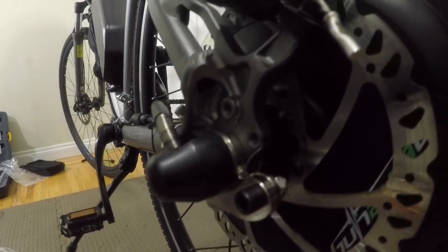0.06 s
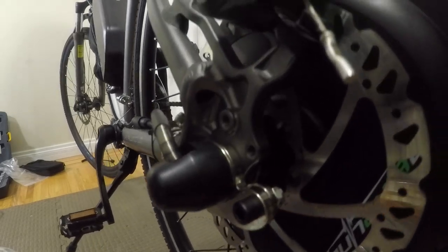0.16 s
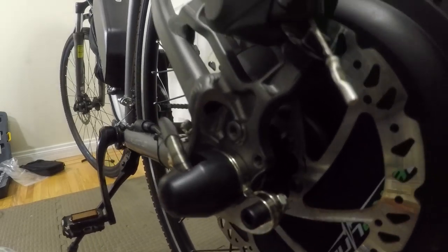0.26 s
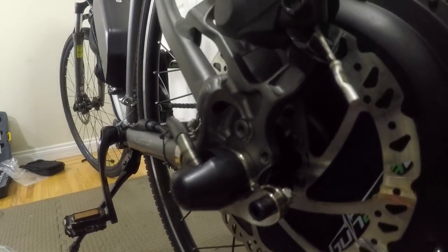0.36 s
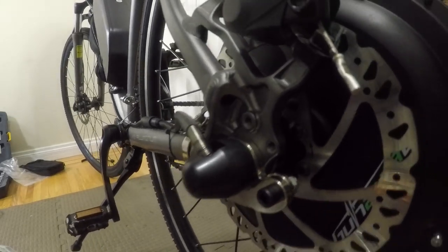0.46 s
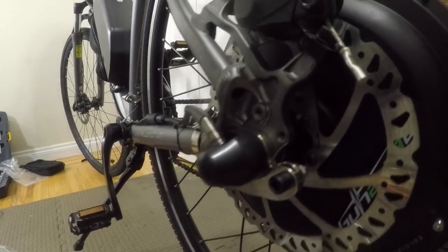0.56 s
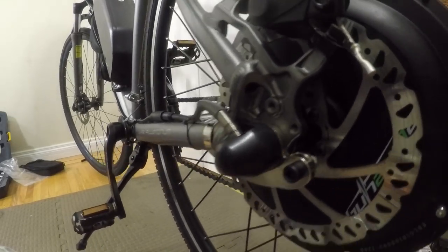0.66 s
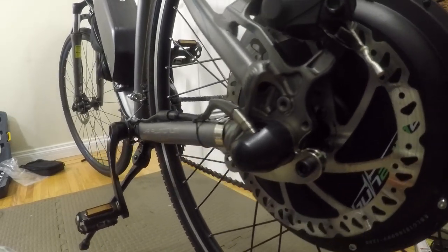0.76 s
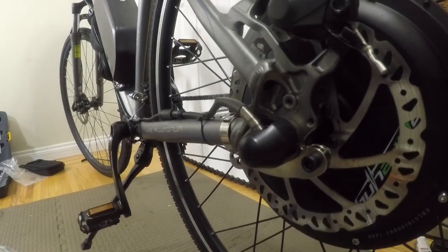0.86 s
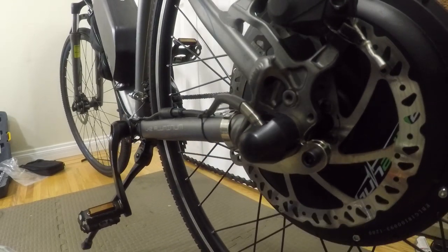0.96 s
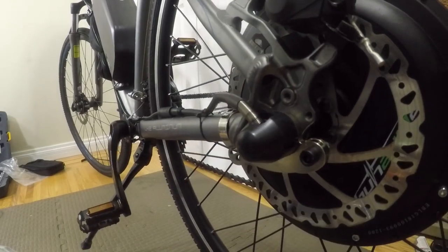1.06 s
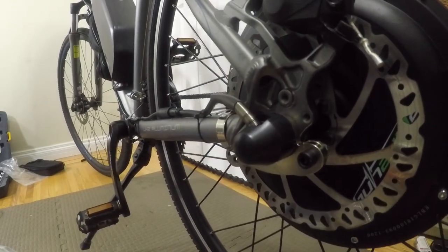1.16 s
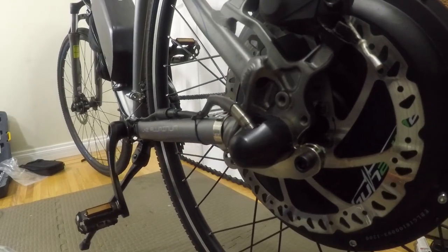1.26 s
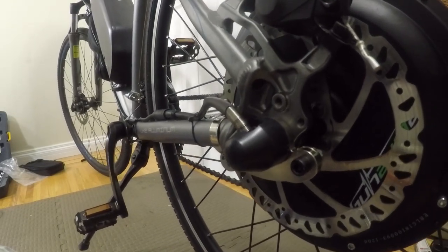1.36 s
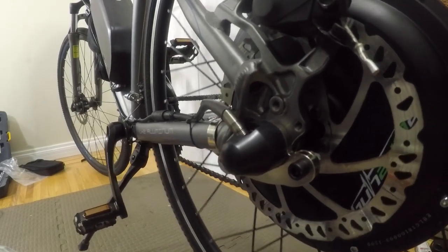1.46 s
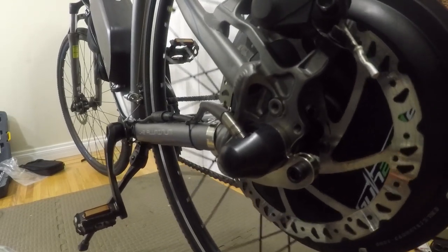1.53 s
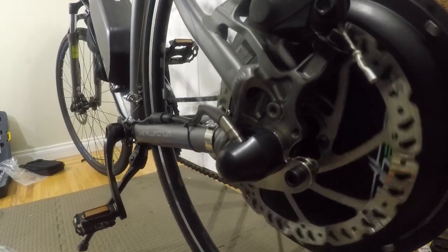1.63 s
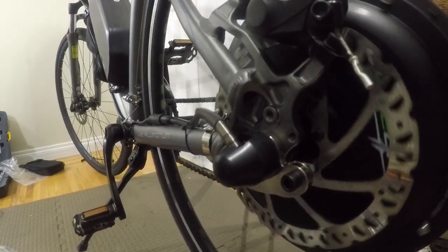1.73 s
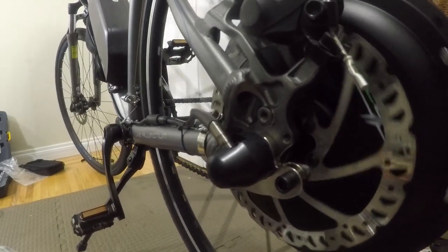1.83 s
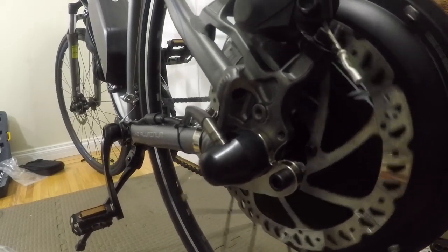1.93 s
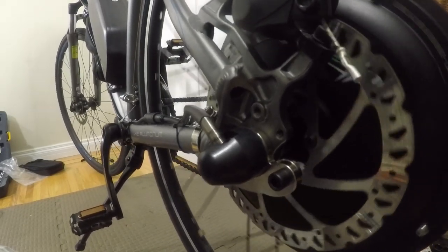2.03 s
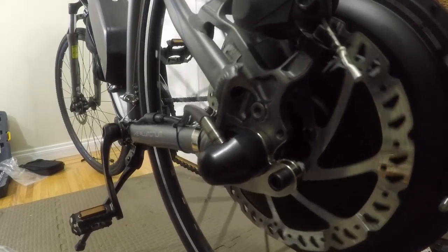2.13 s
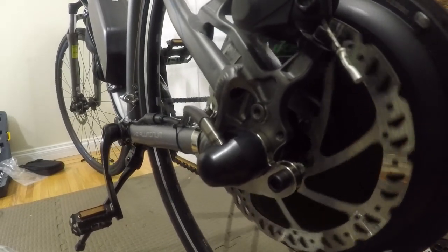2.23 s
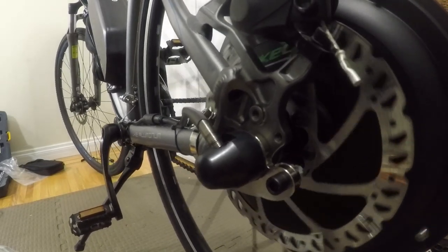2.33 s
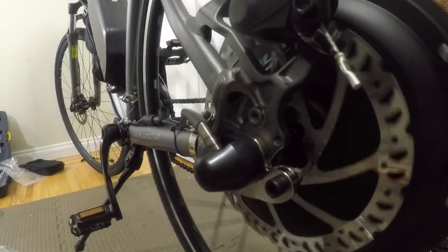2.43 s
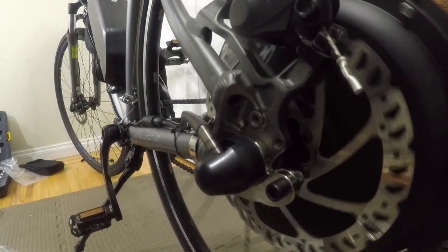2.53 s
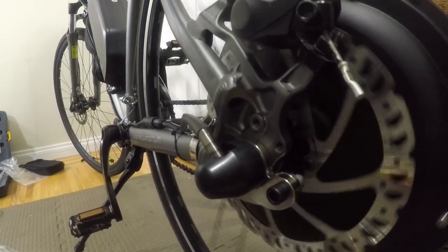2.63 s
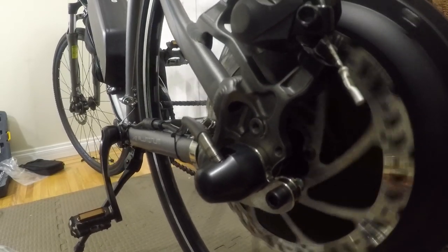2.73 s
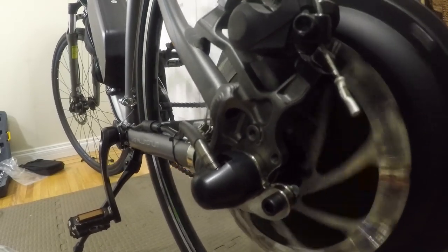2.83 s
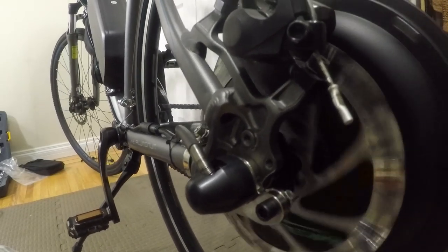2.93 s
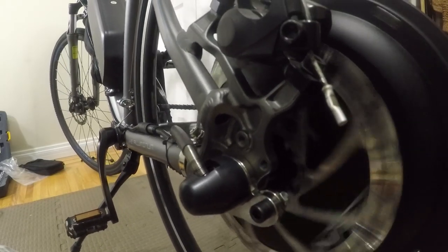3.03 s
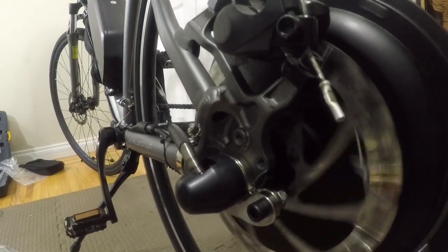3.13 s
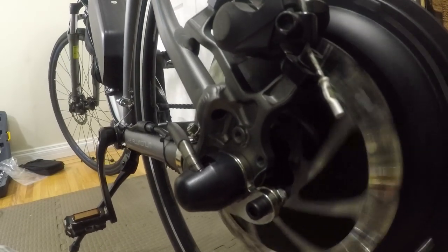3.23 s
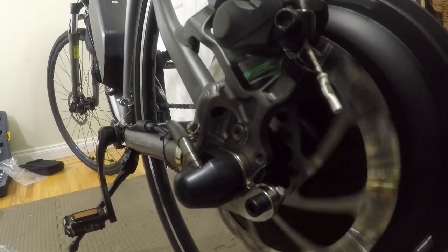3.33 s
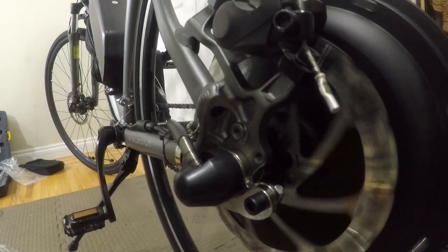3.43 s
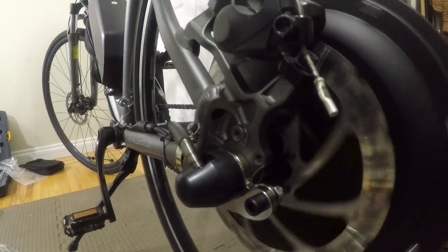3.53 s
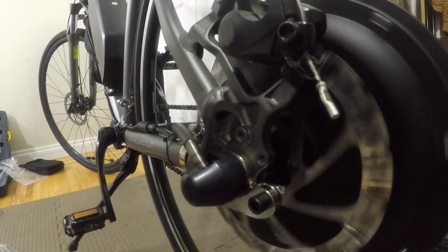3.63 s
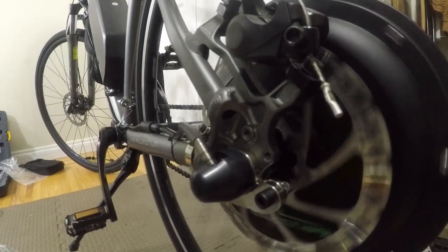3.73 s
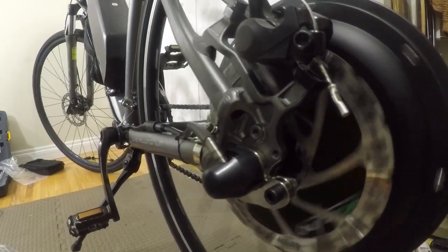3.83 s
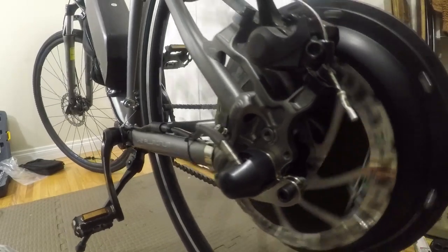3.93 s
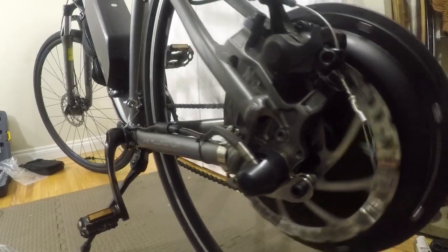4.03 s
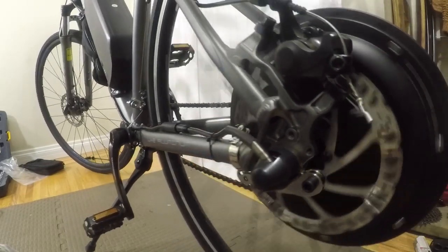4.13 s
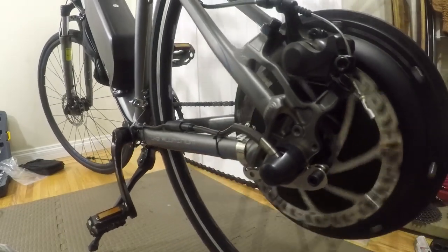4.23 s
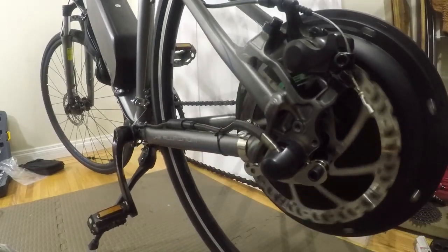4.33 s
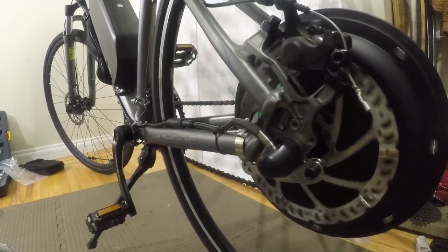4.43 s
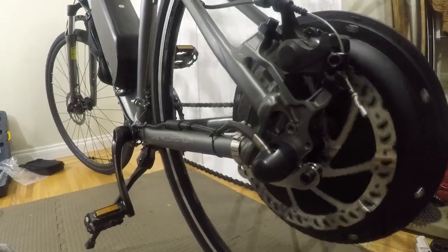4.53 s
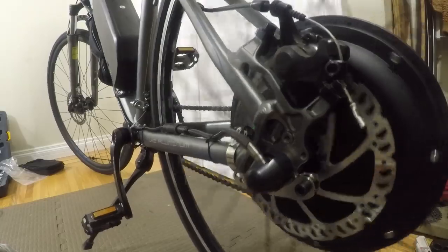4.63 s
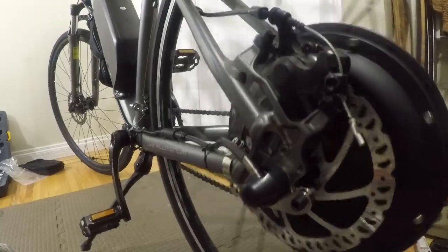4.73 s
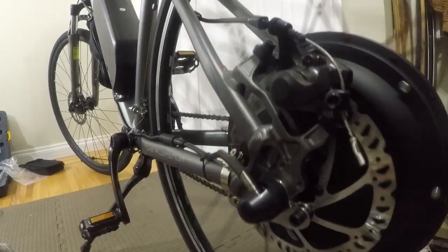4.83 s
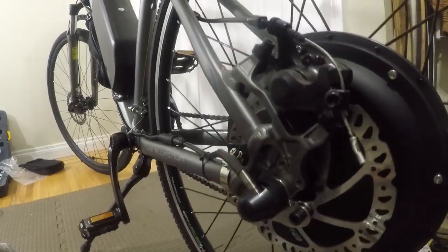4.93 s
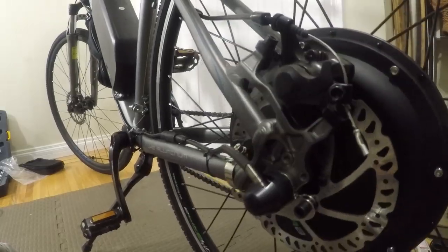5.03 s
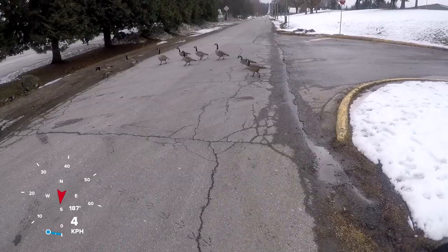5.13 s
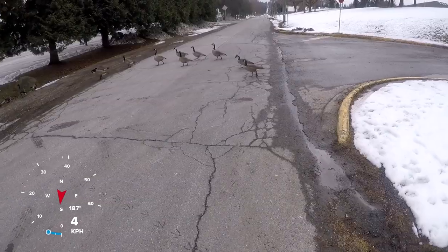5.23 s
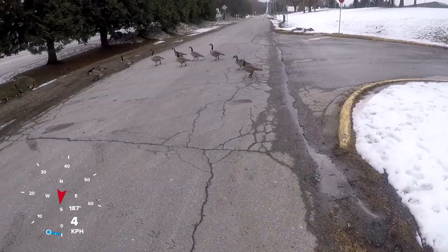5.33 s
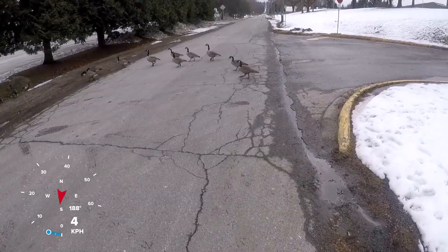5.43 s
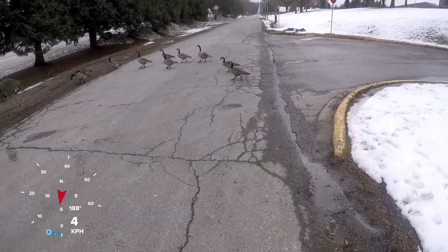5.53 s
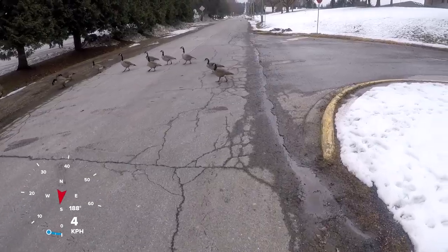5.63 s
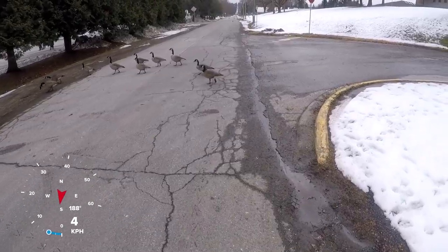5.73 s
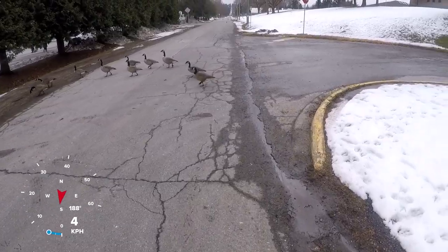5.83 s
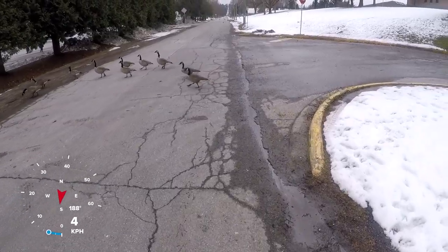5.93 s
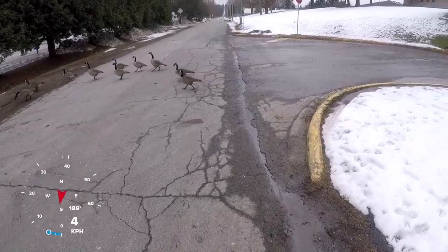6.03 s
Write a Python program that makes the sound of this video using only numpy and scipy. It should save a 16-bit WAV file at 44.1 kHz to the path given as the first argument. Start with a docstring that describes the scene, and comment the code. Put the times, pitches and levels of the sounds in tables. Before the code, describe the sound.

A bicycle hub motor spins a wheel indoors, sharp metallic clicks racing then slowing over brake-disc hiss, before cutting to near-silent, then dull outdoor street noise.

```python
"""A bicycle wheel is spun up indoors by its hub motor and coasts: a loose part snaps over the spokes, each snap
a burst of noise shaped into a crack and rung through resonators. Random small impacts make the gears chatter
and the brake disc hiss and ring; noise through resonators hums, a sine whines, shaped noise is the room's hush.
A falling, wavering tone with rough bass rumbles, then a hard cut leaves a nearly silent street of faint noise.
A duller, louder street noise switches in, with a drone, a brief midrange hiss and one knock."""
import sys
import numpy as np
from scipy import signal
from scipy.fft import rfft, irfft
from scipy.io import wavfile
from scipy.ndimage import uniform_filter1d

SR = 44100
rng = np.random.default_rng(int(sys.argv[2]) if len(sys.argv) > 2 else 0)


def to_wav(sig):
    """Store sig (one row per channel, or 1-D mono) as 16-bit WAV at the path in sys.argv[1].

    Samples outside -1..1 are clipped; the rate is SR.
    """
    pcm = np.clip(np.atleast_2d(sig), -1, 1) * 32767
    pcm = np.round(pcm).astype(np.int16)
    wavfile.write(sys.argv[1], SR, pcm.T)  # frames by channels


N = 267775
T = np.arange(N) / SR  # seconds
CUT_S, SWITCH_S = 5.167, 5.621  # room to quiet street, then the louder street noise

# Levels of the indoor layers are those before the room, the port shading and the filters.
# Spectra give relative density; modes give nominal pitch, relative level and decay time.
# Hush of the room, spectrum: pitch_hz, density_db (per Hz)
HUSH_SPECTRUM = [(20, -27.5), (65, -31), (88, -30.5), (107, -45.5), (134, -8.5), (163, 0), (328, -10.5),
                 (1260, -23), (1610, -23.5), (3340, -36.5), (9670, -33.5), (14700, -41.5), (16000, -66)]
# Hush of the room over time: time_s, level_db
HUSH_LEVEL = [(0, -48), (.9, -50.5), (1.3, -52), (1.6, -48), (2.8, -46), (4.2, -47), (5.17, -49)]
# Short clicks before the motor starts: start_s, peak_db
CLICKS = [(0.031, -48.5), (0.243, -52), (0.345, -48), (0.361, -40)]
# Single ticks in hub and frame: start_s, peak_db, upper_modes_db (against the lower modes)
TICKS = [(1.388, -37, -14), (1.5005, -50, 2), (1.5386, -43.5, 6), (1.605, -30, 4), (1.6817, -43, -5),
         (2.038, -39.5, -2), (2.146, -40, 6), (2.184, -41, 9), (2.258, -39, 6), (2.7254, -31.5, 5),
         (2.747, -27, 9.5), (2.766, -27.5, 10), (2.781, -25, 6.5), (2.7993, -28.5, 5.5), (2.815, -29, 0.5)]
# Modes of the hub shell: pitch_hz, level_db, t60_s
HUB_MODES = [(4450, -4, .045), (4650, -10, .03), (5250, -3, .008), (5650, -6, .02), (7220, 0, .015),
             (9270, -7, .008)]
HUB_UPPER_HZ = 6500
# Controller whine over time: time_s, level_db (before its flicker)
WHINE_LEVEL = [(1.40, -85), (1.43, -63), (2.6, -52), (3.1, -80)]
WHINE_HZ = 15030

# The motor pushes: start_s, hold_s, gear_chatter_db, hum_db
PUSHES = [(1.516, 0.044, -57, -55.5), (2.693, 0.07, -42.5, -46.5)]
PUSH_ATTACK_S, GEAR_RELEASE_DB_S, HUM_RELEASE_DB_S = 0.088, 107, 24.5
GEAR_IDLE_DB, GEAR_DB_PER_OCTAVE = -70, 3.7
HUM_IDLE_DB, HUM_DB_PER_OCTAVE = -67, 1.2
# Hum of the windings: pitch_hz, level_db, t60_s
HUM_MODES = [(506, 1, .14), (528, -1, .11), (563, -2, .1), (740, -11, .07)]
# Low tones of the windings, only under load: pitch_hz, level_db, t60_s
GROWL_MODES = [(215, 2, .12), (410, -4, .18)]
GROWL_DB, GROWL_RELEASE_DB_S = 2, 100  # against the hum of the same push

# The pad bites the high spot of the disc: start_s, hold_s, rub_level_db
BITES = [(1.623, 0.021, -58), (1.652, 0.04, -58), (2.953, 0.061, -49), (3.019, 0.025, -50),
         (3.76, 0.15, -49.5)]
BITE_ATTACK_S, BITE_RELEASE_DB_S = 0.025, 192.5
DRAG_DB, DRAG_DB_PER_OCTAVE = -61, 6  # steady rub
# Hiss of the pad, spectrum: pitch_hz, density_db (per Hz)
PAD_SPECTRUM = [(500, -51), (1000, 13.5), (2300, 10.5), (4500, 8.5), (7500, 12), (10000, -26.5),
                (15000, -24.5)]
# Modes of the brake disc: pitch_hz, level_db, t60_s
DISC_MODES = [(1000, -10, .04), (1500, -10, .08), (2290, -1, .07), (2430, -10, .06), (3240, -15, .06),
              (3500, -8, .08), (4450, -1, .04), (4620, 1, .045), (5670, -5, .04), (6400, -7, .05),
              (7425, -9, .05)]
DISC_FLUTTER_DB = 4.5  # each mode comes and goes alone
# Thin tones of the disc sing for a moment: start_s, hold_s, level_db, pitch_hz
SINGS = [(1.73, 0.053, -65, 2460), (2.24, 0.25, -62, 2470), (3.0, 0.14, -56.5, 2480),
         (3.03, .02, -41, 7430), (3.25, 0.09, -48, 2446)]
SING_RELEASE_DB_S = 151.5
# A last rasp as the wheel stops: start_s, hold_s, level_db
RASP = (4.855, 0.026, -47)
# Rasp, spectrum: pitch_hz, density_db (per Hz)
RASP_SPECTRUM = [(1500, -6.5), (3000, -7), (4500, 2), (6000, -8.5), (9000, -9.5), (13000, -33)]
RASP_RELEASE_DB_S = 270

# The loose part snaps over a spoke: start_s, bright_peak_db, low_peak_db, strongest_low_hz
SNAPS = [(1.6336, -36.5, -41, 1940), (1.7345, -37, -34, 2130), (1.8364, -49, -45, 1390),
         (1.951, -34.5, -35.5, 1460), (2.0851, -35, -34.5, 2980), (2.2209, -41.5, -49, 2950),
         (2.3299, -40.5, -47, 2120), (2.4346, -33.5, -34, 2960), (2.5366, -27, -33, 2130),
         (2.6255, -28.5, -31, 2160), (2.7072, -38, -31, 2240), (2.7744, -39, -35, 2200),
         (2.825, -30.5, -37, 3180), (2.8604, -37.5, -43, 2260), (2.8986, -35.5, -49.5, 2260),
         (2.9347, -36, -35, 2120), (2.9684, -31.5, -41, 2320), (3.0042, -33.5, -39, 1470),
         (3.0402, -31, -43, 2290), (3.0757, -33, -41, 2270), (3.1128, -35, -32, 3230),
         (3.1505, -32.5, -34, 2250), (3.1872, -32.5, -28.5, 2150), (3.2255, -31, -35, 1060),
         (3.2626, -34.5, -36, 1120), (3.3029, -37.5, -34.5, 2490), (3.342, -31, -38, 2400),
         (3.3817, -29, -30.5, 2000), (3.4237, -30, -34, 2070), (3.4631, -29.5, -28, 2110),
         (3.5054, -40, -30, 2150), (3.5468, -34.5, -29, 2160), (3.591, -37.5, -31.5, 2130),
         (3.6353, -38, -53, 2100), (3.683, -39, -49, 2140), (3.7282, -35, -40, 2110),
         (3.7764, -31.5, -45, 1500), (3.8223, -34.5, -43, 2300), (3.8727, -32.5, -37, 3570),
         (3.9235, -36, -40, 1980), (3.9776, -34, -40.5, 1980), (4.0313, -39, -37, 2260),
         (4.0879, -40, -35.5, 2900), (4.1408, -29, -37, 1850), (4.2011, -30, -36, 3080),
         (4.262, -32.5, -51, 2040), (4.3253, -29.5, -36.5, 2950), (4.392, -31, -38, 3070),
         (4.4604, -27, -31, 2030), (4.5299, -31, -32, 2210), (4.6014, -33, -30.5, 2230),
         (4.679, -32, -37, 2170), (4.7614, -29, -41, 2250), (4.8494, -29.5, -45, 3390)]
# On a slow wheel it bounces once more: start_s, peak_db (of its bright ring)
BOUNCES = [(1.644, -42), (4.611, -30.5), (4.689, -32.5), (4.772, -35), (4.861, -29)]
# Crack of a snap, spectrum: pitch_hz, density_db (per Hz)
CRACK_SPECTRUM = [(410, -53.5), (700, -34.5), (1110, -10), (1780, -22.5), (2140, -7.5), (2680, -19.5),
                  (3020, -9.5), (3880, -15), (4540, -12), (6660, -15.5), (7800, -4.5), (10400, -26),
                  (12400, -11), (14900, -6), (16300, -41.5)]
# Shrill ring of a snap: pitch_hz, level_db, t60_s
SHRILL_MODES = [(12490, -4.5, 0.021), (13150, 1, 0.007), (14160, -8.5, 0.013)]
# Bright ring of a snap: pitch_hz, level_db, t60_s
BRIGHT_MODES = [(7500, -7, .01), (7780, -3, .014), (7970, 0, .02), (7950, -12, .075), (7860, -14, .065),
                (7650, -21, .06)]
# Lower tones common to the spokes: pitch_hz, level_db, t60_s
SPOKE_MODES = [(2110, -16, 0.059), (3470, -6.5, 0.02)]
SLOW_PER_S = 10  # speed-following levels are given at this many snaps a second
CRACK_DB, CRACK_DB_PER_OCTAVE = -28, 0.5  # peak; a faster wheel cracks harder
CRACK_SCATTER_DB, SHRILL_SCATTER_DB = 1.5, 2.5

# Tone that sinks into a rumble: time_s, pitch_hz (before its waver), level_db
RUMBLE_PATH = [(4.86, 299, -55), (4.915, 248.5, -43), (4.95, 110, -41), (5.0, 55.7, -40),
               (5.06, 35.8, -36.5), (5.17, 27, -37.5)]
# Rough bass around it, spectrum: pitch_hz, density_db (per Hz)
RUMBLE_SPECTRUM = [(14, -25), (30, 0), (45, -4), (59, 2), (80, -6), (200, -16), (500, -38)]

ROOM_T60_S, ROOM_DB = 0.24, -5.5  # tail decay; tail energy before its low-pass, against the direct sound
TAIL_TOP_HZ, WIND_CUT_HZ = 15300, 125
FAR_PORT_DB = -3.5  # the left port is shaded from the wheel
STEREO_HZ, TOP_HZ = 11500, 16400  # indoors the channels differ only above the first; top of the whole mix

# Faint wind and distance, spectrum: pitch_hz, density_db (per Hz)
FAR_SPECTRUM = [(12, -33), (20, -1), (37, -8.5), (80, -17.5), (175, -26), (235, -29.5), (2540, -54),
                (12000, -57.5), (15600, -90.5), (22000, -120)]
FAR_DB = -68
# Street noise, spectrum: pitch_hz, density_db (per Hz)
STREET_SPECTRUM = [(12, -38), (20, -9), (60, -22), (108, 0), (151, -6.5), (285, -6), (347, -13.5),
                   (500, -10), (638, -14), (757, -13), (966, -19.5), (6800, -34), (8840, -86),
                   (15000, -120)]
STREET_DB, STREET_TOP_HZ = -51.5, 6900
DRONE_HZ, DRONE_DB = 285, -55
CRUNCH_HZ, CRUNCH_DB, CRUNCH_RELEASE_DB_S = 1780, -62, 84
# Modes of the knock: pitch_hz, level_db, t60_s
KNOCK_MODES = [(287, 0, 0.03), (510, 3, 0.03), (730, -2, 0.02), (1150, -8, .015), (1600, -8, 0.012)]
KNOCK_S, KNOCK_DB = 5.752, -35.5  # start; peak before the street's low-pass


def undb(db):
    """Decibels to gain."""
    return 10 ** (np.asarray(db) / 20)


def unit(x):
    """Scale to rms 1."""
    return x / np.sqrt(np.mean(x ** 2))


def envelope(table):
    """Gain over time from time and level points; practically silent outside them."""
    s, db = np.transpose(table)
    return undb(np.interp(T, s, db, left=-150, right=-150))


def swell(s, hold_s, db, attack_s, release_db_s):
    """Gain with a squared attack, a hold and a release at a steady dB per second."""
    rise = np.clip((T - s) / attack_s, 0, 1) ** 2
    return rise * undb(db - release_db_s * np.maximum(T - s - attack_s - hold_s, 0))


def walk(rate):
    """Random levels held 1 / rate s and slewed; spread near 1."""
    k = int(SR / rate)
    return uniform_filter1d(np.repeat(rng.standard_normal(N // k + 1), k), k)[:N]


def colour(x, points):
    """Shape a spectrum by pitch and dB points, joined on a log pitch scale."""
    hz, db = np.transpose(points)
    log_f = np.log(np.fft.rfftfreq(x.shape[-1], 1 / SR) + 1)
    return irfft(rfft(x) * undb(np.interp(log_f, np.log(hz), db)), x.shape[-1])


def steep(x, hz, kind):
    """Steep low- or high-pass."""
    return signal.sosfilt(signal.ellip(6, .5, 60, hz, kind, fs=SR, output="sos"), x)


def noise(points, flicker_db, channels=1):
    """Coloured noise whose level flickers."""
    return unit(colour(rng.standard_normal((channels, N)), points)) * undb(flicker_db * walk(18))


def ring(x, modes):
    """Drive two-pole resonators of alternating sign, impulse height near each one's gain."""
    out = 0
    for k, (hz, db, t60) in enumerate(modes):
        r = np.exp(-np.log(1000) / (max(t60, .005) * SR))
        w = 2 * np.pi * hz / SR
        mode = signal.lfilter([0, np.sin(w)], [1, -2 * r * np.cos(w), r * r], x)
        out = out + (-1) ** k * undb(db) * mode
    return out


def ringing_noise(modes):
    """Steady noise through resonators, at rms 1."""
    return unit(ring(rng.standard_normal(N), modes))


def detune(modes, spread):
    """Every blow sits a little off the last in pitch and strength."""
    draws = rng.standard_normal((len(modes), 2))
    return [(hz * (1 + spread * a), db + 3 * b, t60) for (hz, db, t60), (a, b) in zip(modes, draws)]


def scrape(rise_s, fall_s):
    """A contact that lasts a few milliseconds: noise that swells and dies."""
    t = T[:8192]
    return rng.standard_normal(len(t)) * (1 - np.exp(-t / rise_s)) * np.exp(-t / fall_s)


def chatter(rate, spread_db):
    """Random small impacts of uneven size and random sign, on average rate of them a second."""
    chance = rng.random((3, N))
    size = undb(-spread_db * np.log(chance[2] + 1e-9))
    return (chance[0] < rate / SR) * np.sign(chance[1] - .5) * size


def add(track, s, sound, db):
    """Lay a sound on a track with a given peak."""
    i = int(s * SR)
    sound = sound[:N - i]
    track[i:i + len(sound)] += sound * undb(db) / np.abs(sound).max()


def speed(t):
    """Wheel speed in snaps a second, from the gaps between snaps."""
    s = np.array(SNAPS)[:, 0]
    return np.interp(t, (s[1:] + s[:-1]) / 2, 1 / np.diff(s))


def speed_gain(db, db_per_octave):
    """Gain that follows smoothed wheel speed and drops to a low floor at rest."""
    turning = (T > SNAPS[0][0]) * (T < RASP[0])
    smooth = uniform_filter1d(speed(T) * turning, size=SR // 20)
    return undb(db + db_per_octave * np.log2(np.maximum(smooth, .01) / SLOW_PER_S))


def hush():
    """Room hush: coloured noise in two independent channels with a slow level curve."""
    return envelope(HUSH_LEVEL) * steep(noise(HUSH_SPECTRUM, 0.8, channels=2), TAIL_TOP_HZ, "low")


def clicks():
    """Short clicks: brief scrapes with the pad's colour."""
    out = np.zeros(N)
    for s, db in CLICKS:
        add(out, s, colour(scrape(0.0013, 0.0047), PAD_SPECTRUM)[:4096], db)
    return out


def ticks():
    """Hub and frame ticks: a very short scrape rings the shell, with some pad-coloured noise on top."""
    out = np.zeros(N)
    for s, db, upper_db in TICKS:
        modes = [(hz, g + upper_db * (hz > HUB_UPPER_HZ), t60) for hz, g, t60 in detune(HUB_MODES, .006)]
        shell = ring(scrape(.0002, .001), modes)
        contact = colour(scrape(.0002, .002), PAD_SPECTRUM) * (T[:8192] < .1)
        add(out, s, shell + .4 * contact, db)
    return out


def whine():
    """Controller whine: a flickering sine, weaker and of opposite sign on the right."""
    tone = np.sin(2 * np.pi * WHINE_HZ * T)
    return envelope(WHINE_LEVEL) * undb(3.5 * walk(90)) * tone * np.array([[1], [-.6]])


def gears():
    """Gear teeth chatter in the hub shell, louder with wheel speed and with each push."""
    level = speed_gain(GEAR_IDLE_DB, GEAR_DB_PER_OCTAVE)
    for s, hold, db, _ in PUSHES:
        level = level + swell(s, hold, db, PUSH_ATTACK_S, GEAR_RELEASE_DB_S)
    return level * unit(ring(chatter(600., 3.), HUB_MODES))


def windings():
    """The motor windings hum as resonated noise, with a lower growl under load."""
    hum = speed_gain(HUM_IDLE_DB, HUM_DB_PER_OCTAVE)
    growl = 0
    for s, hold, _, db in PUSHES:
        hum = hum + swell(s, hold, db, PUSH_ATTACK_S, HUM_RELEASE_DB_S)
        growl = growl + swell(s, hold, db + GROWL_DB, PUSH_ATTACK_S, GROWL_RELEASE_DB_S)
    return hum * ringing_noise(HUM_MODES) + growl * ringing_noise(GROWL_MODES)


def brake():
    """One stream of grit makes the pad hiss, rings and sings the disc, and gives the last rasp."""
    grit = chatter(3000., 1.8)
    rub = speed_gain(DRAG_DB, DRAG_DB_PER_OCTAVE)
    for row in BITES:
        rub = rub + swell(*row, BITE_ATTACK_S, BITE_RELEASE_DB_S)
    bite = rub / undb(-53.5)  # a harder rub rings the disc more than it hisses
    disc = sum(ring(grit * undb(DISC_FLUTTER_DB * walk(28)), [mode]) for mode in DISC_MODES)
    hiss = undb(3.5 * walk(70)) / np.sqrt(np.maximum(bite, 1)) * unit(colour(grit, PAD_SPECTRUM))
    out = rub * (bite ** .8 * unit(disc) + hiss)
    for s, hold, db, hz in SINGS:
        out += swell(s, hold, db, BITE_ATTACK_S, SING_RELEASE_DB_S) * unit(ring(grit, [(hz, 0, .12)]))
    return out + swell(*RASP, BITE_ATTACK_S, RASP_RELEASE_DB_S) * unit(colour(grit, RASP_SPECTRUM))


def snaps():
    """Each snap scrapes a spoke: a broad crack, a shrill and a bright ring, and that spoke's lower tones.
    Crack and shrill ring are drawn separately for each channel, so their treble sounds wide."""
    ports, shared = np.zeros((2, N)), np.zeros(N)
    scatter = rng.standard_normal((len(SNAPS), 2))
    for (s, bright_db, low_db, low_hz), (crack_z, shrill_z) in zip(SNAPS, scatter):
        octaves = np.log2(speed(s) / SLOW_PER_S)
        crack_db = CRACK_DB + CRACK_DB_PER_OCTAVE * octaves + CRACK_SCATTER_DB * crack_z
        shrill_db = crack_db - 2.0 + SHRILL_SCATTER_DB * shrill_z
        for port in ports:
            add(port, s, colour(scrape(0.00083, 0.01), CRACK_SPECTRUM)[:4096], crack_db)
            add(port, s, ring(scrape(0.00034, 0.0027), detune(SHRILL_MODES, 0.023)), shrill_db)
        add(shared, s, ring(scrape(.003, .0018), detune(BRIGHT_MODES, .004)), bright_db)
        low_modes = detune(SPOKE_MODES, .015) + [(low_hz, 0, .022)]
        add(shared, s, ring(scrape(.001, .002), low_modes), low_db)
    for s, db in BOUNCES:
        add(shared, s, ring(scrape(.001, .0016), detune(BRIGHT_MODES, .004)), db)
        add(shared, s, colour(scrape(0.00083, 0.011), CRACK_SPECTRUM)[:4096], db - 6)
    return ports + shared


def room(x):
    """Direct sound plus a diffuse tail of decaying noise, one for each channel."""
    t = T[:SR // 2]
    decay = np.exp(-np.log(1000) * t / ROOM_T60_S) * (1 - np.exp(-t / 0.0024))
    tail = rng.standard_normal((2, len(t))) * decay
    tail *= undb(ROOM_DB) / np.sqrt(np.sum(tail ** 2, axis=1, keepdims=True))
    return x + signal.fftconvolve(x, steep(tail, TAIL_TOP_HZ, "low"), axes=1)[:, :N]


def rumble():
    """A wavering tone that falls, with rough bass growing around it."""
    s, hz, db = np.transpose(RUMBLE_PATH)
    pitch = np.interp(T, s, hz) * (1 + .3 * walk(60))
    tone = np.sin(2 * np.pi * np.cumsum(pitch) / SR)
    growth = np.clip((T - s[1] - .02) / 0.05, 0, 1)
    rough = growth * steep(noise(RUMBLE_SPECTRUM, 1.0), 830, "low")
    return undb(np.interp(T, s, db, left=-150)) * (tone + 0.57 * rough)


def indoors():
    """Wheel in its room, whine, hush and rumble; below the treble both channels carry the right port."""
    machine = clicks() + ticks() + gears() + windings() + brake()
    wheel = steep(room(snaps() + machine), WIND_CUT_HZ, "high")
    ports = wheel * undb([[FAR_PORT_DB], [0]]) + whine() + hush()
    split = signal.cheby1(10, .1, STEREO_HZ, "high", fs=SR, output="sos")
    treble = signal.sosfiltfilt(split, ports)
    return treble + (ports - treble)[1] + rumble()


def distance():
    """Faint wind and distance: quiet coloured noise."""
    return undb(FAR_DB) * noise(FAR_SPECTRUM, 1.6)


def crunch():
    """A midrange hiss that fades as the street comes in: noise through one broad resonator."""
    level = swell(SWITCH_S, .04, CRUNCH_DB, .005, CRUNCH_RELEASE_DB_S)
    return level * ringing_noise([(CRUNCH_HZ, 0, .005)])


def knock():
    """One knock: a very short scrape rings a few low modes."""
    out = np.zeros(N)
    add(out, KNOCK_S, ring(scrape(0.00036, 0.00083), KNOCK_MODES), KNOCK_DB)
    return out


def street():
    """Dull street noise, a steady drone and the hiss switch in together; the knock joins them."""
    drone = undb(DRONE_DB) * ringing_noise([(DRONE_HZ, 0, .25)])
    bed = undb(STREET_DB) * noise(STREET_SPECTRUM, 0.82) + drone + crunch()
    return steep(bed * (T > SWITCH_S) + knock(), STREET_TOP_HZ, "low")


def scene():
    """A hard cut from the room to the street."""
    return np.where(T < CUT_S, indoors(), distance() + street())


def record(dry):
    """A very steep low-pass takes off the extreme top."""
    return signal.sosfilt(signal.ellip(10, .2, 80, TOP_HZ, fs=SR, output="sos"), dry)


dry = scene()
out = record(dry)
to_wav(out)
```